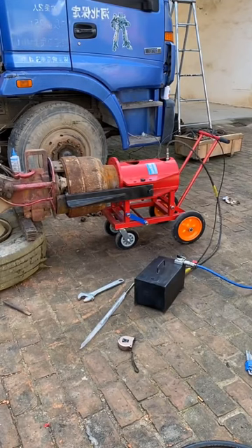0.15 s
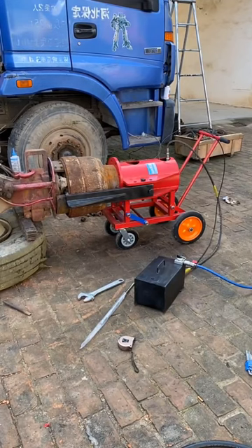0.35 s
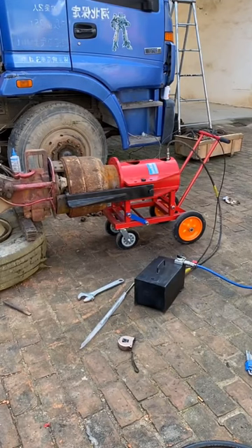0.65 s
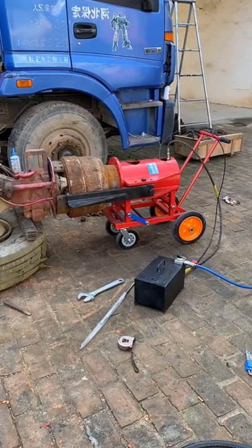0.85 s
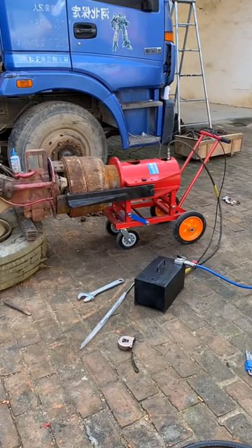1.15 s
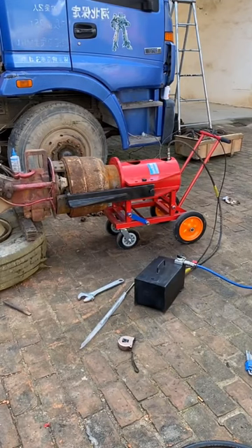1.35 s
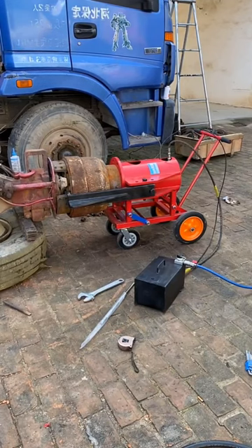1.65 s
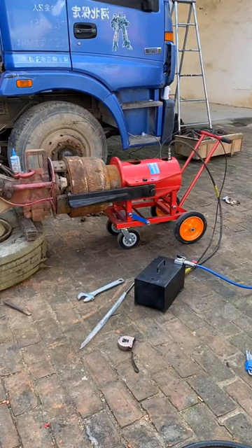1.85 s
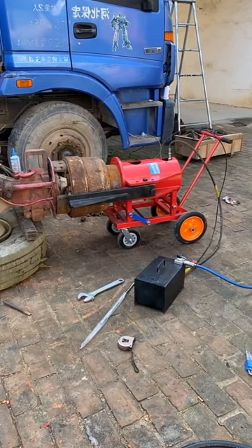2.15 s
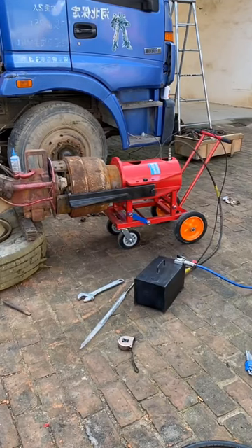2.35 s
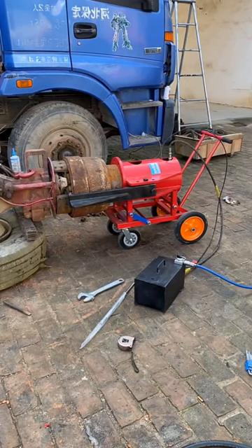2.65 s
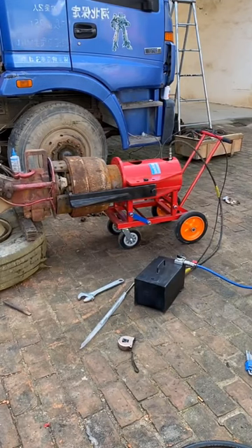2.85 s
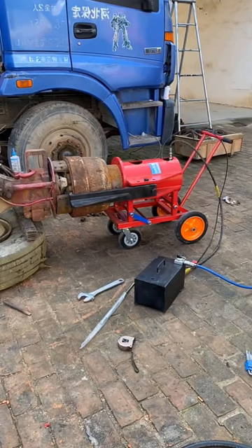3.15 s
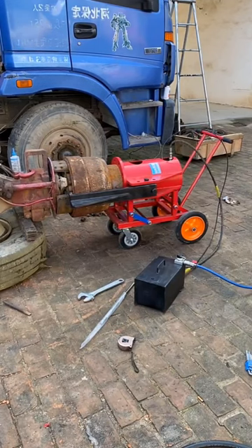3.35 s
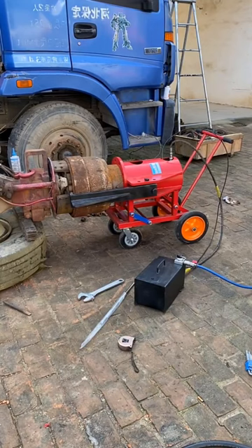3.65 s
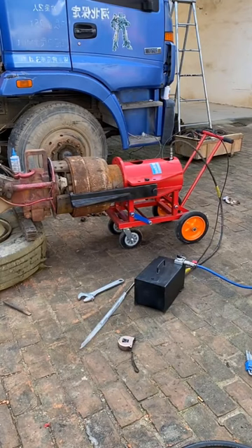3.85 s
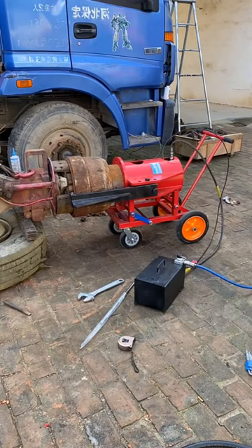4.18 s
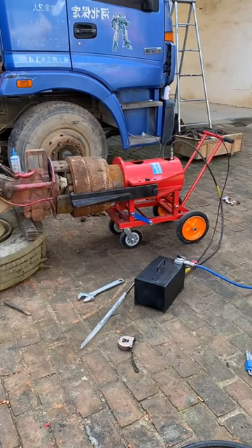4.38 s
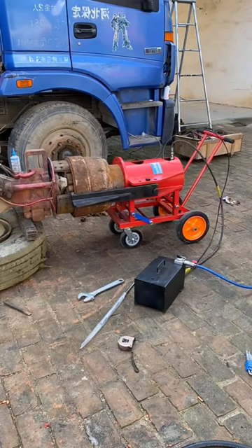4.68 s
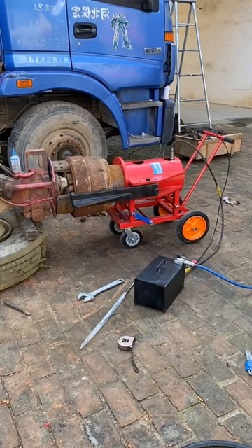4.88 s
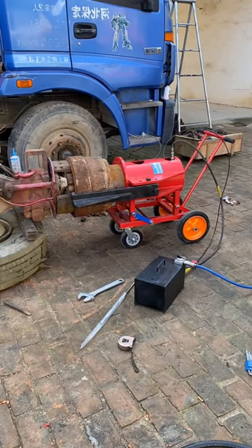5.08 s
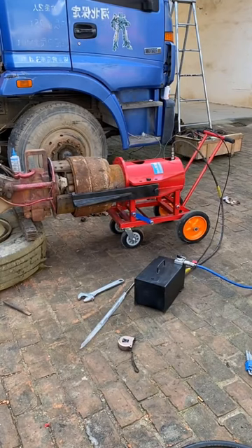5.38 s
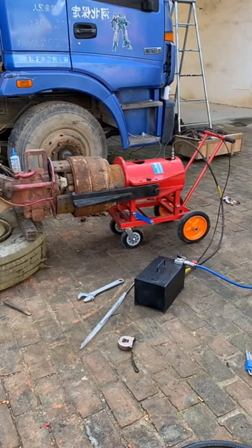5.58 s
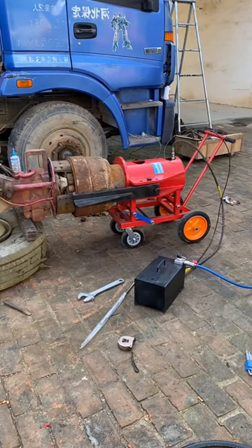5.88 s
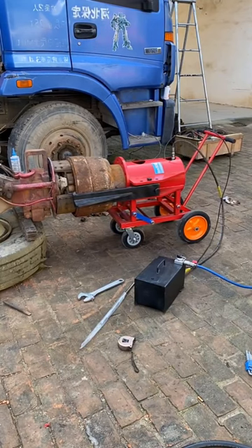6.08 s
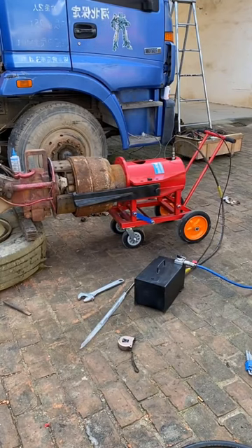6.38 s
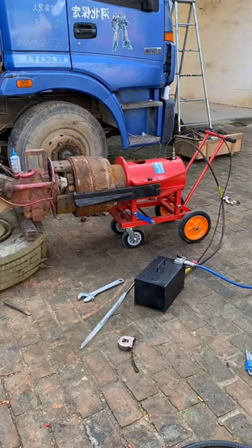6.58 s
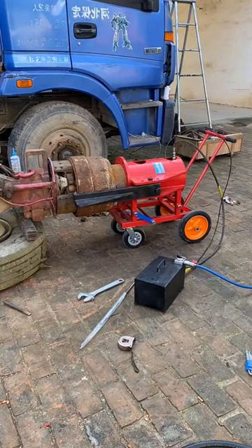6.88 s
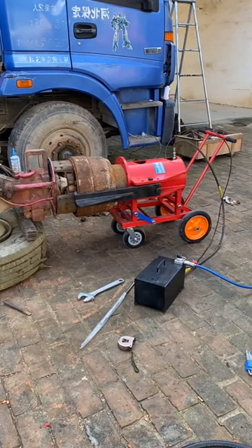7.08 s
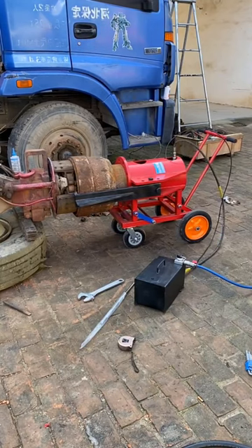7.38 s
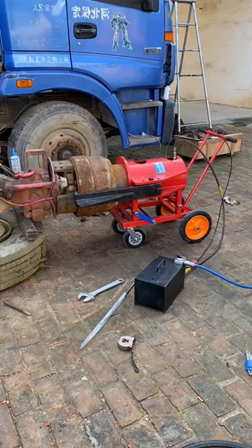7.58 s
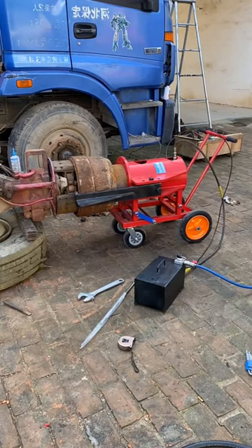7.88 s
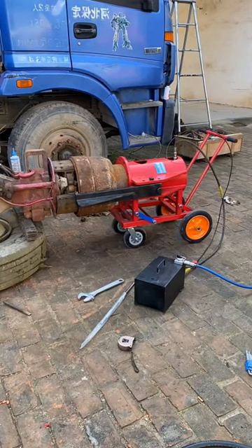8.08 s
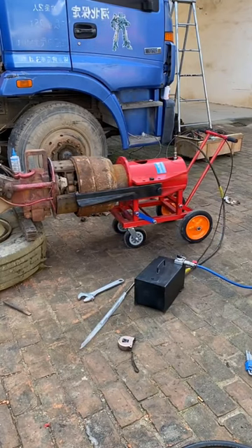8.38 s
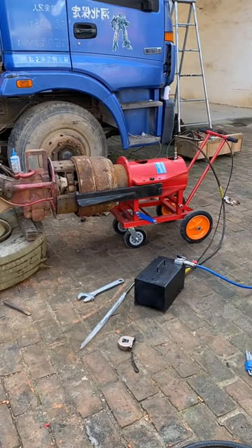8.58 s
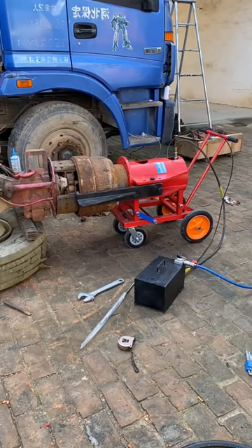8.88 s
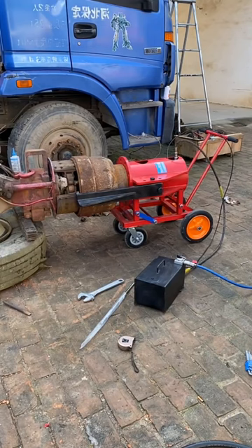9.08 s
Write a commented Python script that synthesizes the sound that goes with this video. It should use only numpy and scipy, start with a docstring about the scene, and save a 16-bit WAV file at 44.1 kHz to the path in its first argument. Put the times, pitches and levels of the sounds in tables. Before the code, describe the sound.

A pneumatic hammer on a trolley drives into a rusty truck axle housing at about thirteen blows a second, never pausing. Each blow is a hard mid-pitched knock with a quick second touch, a short dull ring and a chatter of loose parts. Air puffs hiss between blows over a steady leak, soft piston thumps and low rumble. Heard in stereo from a few metres in a paved yard, with short echoes.

```python
"""A hard metallic hammering at about thirteen blows a second: an air hammer on a trolley drives into
a rusty axle housing in a paved yard. Each blow knocks, touches again and sets housing modes ringing;
loose parts rattle as noise-timed clicks into more modes, and the valve vents a burst of coloured noise.
Soft piston thumps, a steady leak and a low rumble lie underneath; ground, truck and wall throw short echoes."""
import sys
import numpy as np
from scipy import signal
from scipy.fft import rfft, irfft, next_fast_len
from scipy.io import wavfile

SR = 44100
rng = np.random.default_rng(int(sys.argv[2]) if len(sys.argv) > 2 else 0)


def output_pcm(signal):
    """Save a mono or channel-first signal as 16-bit PCM at the path in sys.argv[1].

    Samples are clipped to [-1, 1] before scaling.
    """
    pcm = np.clip(np.atleast_2d(signal).T, -1, 1) * 32767
    wavfile.write(sys.argv[1], SR, np.round(pcm).astype(np.int16))


N = 407043  # length [samples]

# Blows: (first contact [s], its level [dB], second touch after it, before if negative [s],
# second touch level [dB], lower bell level [dB], upper bell level [dB])
BLOWS = [(0.022, -12.5, 0.009, -27, -31, -32.5), (0.096, -11.5, 0.0318, -22, -31, -32.5),
         (0.1678, -11, 0.0086, -11, -25, -32), (0.2409, -12.5, -0.015, -17, -26.5, -27),
         (0.3194, -10, -0.011, -12, -27, -28), (0.3995, -14, 0.006, -18, -29, -27),
         (0.466, -9, -0.0055, -17, -29, -27), (0.541, -7, 0.0031, -22, -25.5, -23.0),
         (0.617, -10.0, 0.0223, -16, -26, -31.0), (0.6905, -10.5, -0.017, -16.0, -33, -36),
         (0.765, -15, -0.0062, -15, -34, -37.5), (0.844, -10.5, 0.013, -9, -27, -25),
         (0.917, -11, -0.007, -13, -28, -27), (0.9884, -7, 0.0037, -12, -25, -27),
         (1.0646, -10, -0.013, -12, -31, -29), (1.139, -9.5, 0.014, -20, -33, -34),
         (1.2075, -13, 0.02, -11, -26.5, -23), (1.2879, -11.5, 0.0109, -16, -25, -31.0),
         (1.359, -10, 0.0075, -8, -25.5, -25), (1.435, -9, 0.0079, -12, -27, -20.0),
         (1.5088, -15, 0.0075, -12, -28, -20.5), (1.583, -8, 0.0035, -12, -25, -26),
         (1.6592, -11.5, 0.0046, -18, -34.0, -43.5), (1.7356, -15.5, 0.0092, -12, -33, -44),
         (1.8084, -11.5, 0.019, -13, -26.5, -23), (1.8834, -11, -0.012, -14, -26.5, -22.5),
         (1.9563, -8, 0.0089, -8, -23.5, -25.0), (2.0317, -10.0, 0.0075, -13, -25, -40),
         (2.1028, -14.0, 0.0078, -10, -30, -26.0), (2.1803, -10, 0.014, -22, -27, -31),
         (2.2541, -8, 0.015, -13.5, -27, -23), (2.3286, -10, 0.0095, -12, -23.5, -22),
         (2.4011, -10.5, 0.0085, -11, -24, -24), (2.478, -6, 0.01, -11, -29, -29),
         (2.5509, -11, 0.015, -15, -33.0, -35), (2.627, -11.5, 0.025, -13, -28.5, -30),
         (2.7013, -9, 0.0123, -15, -27, -29.0), (2.7815, -10.5, 0.011, -20, -25.5, -27),
         (2.8507, -13.0, -0.014, -17, -29, -40), (2.923, -10.0, 0.0075, -18.0, -31, -33),
         (2.9978, -8, 0.0061, -12, -24.5, -26), (3.074, -10.5, -0.0059, -16, -27, -37),
         (3.1476, -6.5, 0.011, -12, -25, -28), (3.222, -10.5, 0.0128, -14, -29, -24.5),
         (3.2943, -13, 0.025, -14, -32.0, -35), (3.3713, -6, 0.023, -16, -26, -30),
         (3.4421, -10.0, 0.02, -11, -25.5, -29), (3.516, -12, 0.0059, -7.5, -31, -33),
         (3.5977, -14, -0.012, -16, -38, -35), (3.665, -12, 0.015, -13, -28.5, -22),
         (3.7431, -12.5, 0.0075, -10.5, -26.0, -27.0), (3.813, -14, 0.011, -15.5, -33.5, -24.0),
         (3.8912, -9, 0.0054, -11.0, -25.5, -28), (3.963, -11, 0.034, -21.5, -30, -33.0),
         (4.036, -12.5, 0.0076, -13, -28.5, -29), (4.1095, -12.5, 0.0085, -18, -27.5, -36),
         (4.186, -7.5, 0.014, -14, -25, -34), (4.26, -9.5, 0.0112, -17, -29.0, -28),
         (4.33, -11.0, 0.041, -15, -31.0, -33), (4.4095, -11.5, 0.011, -8, -30, -34),
         (4.4856, -9.5, 0.0059, -16, -24, -30), (4.5605, -8, 0.0075, -17, -26.5, -34.5),
         (4.632, -10.5, 0.013, -18, -32, -39), (4.711, -8, 0.028, -19, -29, -29.5),
         (4.786, -14.5, 0.0111, -19, -26, -32), (4.8584, -9.5, -0.008, -15, -31, -38),
         (4.9325, -11, 0.012, -12.5, -25.5, -29.5), (5.008, -9.5, 0.017, -12, -27, -24.5),
         (5.0823, -7.5, 0.02, -22, -28, -21.5), (5.1564, -11.5, 0.0075, -14.5, -23.5, -24),
         (5.2317, -8, 0.0075, -11.0, -23, -27), (5.3015, -13, 0.0075, -11, -30, -42),
         (5.3831, -9, -0.0063, -14, -37.0, -37.5), (5.4552, -10, 0.0129, -15.5, -26, -26),
         (5.5287, -7, 0.016, -16, -23.5, -31), (5.603, -7.5, 0.0088, -11, -24, -24),
         (5.6761, -13, 0.0085, -15, -25.5, -30), (5.7526, -14, -0.009, -17, -34.0, -35.5),
         (5.826, -11, 0.0152, -19, -29, -24), (5.9019, -7.5, 0.0077, -13, -25, -27),
         (5.9756, -8, 0.013, -10.0, -23.5, -28.5), (6.0508, -7, 0.034, -16.0, -30, -38),
         (6.1239, -9, 0.024, -33, -29, -40), (6.1965, -9.5, 0.014, -22, -28.5, -32.0),
         (6.274, -10.5, 0.0084, -16, -23, -28), (6.3482, -10, 0.0075, -11.5, -24, -34.0),
         (6.421, -7.5, 0.016, -15.0, -25, -36), (6.499, -7.5, -0.0021, -16, -26, -35.5),
         (6.569, -13, 0.026, -12, -25, -26), (6.6467, -8, 0.0082, -14, -24.5, -31.0),
         (6.7221, -7.5, 0.012, -20, -24, -25), (6.7968, -5.5, 0.018, -23, -25, -36),
         (6.8723, -8, 0.0065, -17, -28, -32), (6.9445, -13.0, -0.0095, -15.0, -26.0, -29.5),
         (7.0203, -20.5, 0.0088, -16.0, -27, -22.5), (7.0936, -8, 0.031, -14.5, -24, -31.0),
         (7.1681, -11, 0.012, -12, -29, -24), (7.2461, -5.5, 0.015, -28, -25.5, -31),
         (7.3185, -6, 0.0093, -13, -26.5, -31.5), (7.392, -11.5, 0.012, -19, -28, -26.5),
         (7.4687, -6.5, 0.0091, -18, -28, -27), (7.5413, -8.5, 0.014, -20, -26.5, -27),
         (7.6163, -9, 0.015, -15.5, -29, -30.0), (7.6894, -8, 0.0097, -10, -24, -30),
         (7.766, -8, 0.0045, -11, -27.0, -30.5), (7.8395, -9.5, 0.032, -17, -28.5, -32.5),
         (7.9163, -10, -0.009, -15, -27.5, -29), (7.9906, -13, 0.012, -14, -31, -27.5),
         (8.065, -8, 0.012, -16, -26, -30), (8.14, -8.5, 0.016, -12, -27, -27.0),
         (8.2135, -8, 0.031, -13, -28, -25.0), (8.2882, -11, 0.018, -16, -29, -32),
         (8.3618, -10.5, 0.0073, -12, -27, -24), (8.4405, -9, 0.013, -11, -26, -29),
         (8.5136, -6.5, 0.012, -13, -29, -23), (8.5892, -4, 0.0048, -19, -28, -30),
         (8.6656, -11.5, -0.007, -14, -32.0, -24), (8.735, -9, 0.021, -15, -25.5, -24),
         (8.8106, -11.5, 0.011, -12, -27.0, -31), (8.8859, -13.5, 0.014, -14, -32.0, -27.5),
         (8.9605, -10.5, 0.0099, -12, -33, -24), (9.035, -12, 0.0271, -19, -33, -30.5),
         (9.1098, -8.5, 0.021, -11, -25, -27.5), (9.194, -5, 0.01, -11, -25.0, -27)]
# Housing modes struck at once: (pitch [Hz], level from the contact [dB], from other touches [dB], t60 [s])
KNOCK_MODES = [(933, -19, -2, 0.056), (1043, -13.5, -16, 0.06), (1065.2, -3.5, -7, 0.072),
               (1083, -5, -13, 0.067), (1205, -12.5, -3.5, 0.092), (1271, -2, -17, 0.088),
               (1299, -16, 0.5, 0.042), (1126, -28, -24, 0.051), (1400, -17.5, -22, 0.093),
               (1516, -10, -15.5, 0.093), (1686, 1, 2, 0.012)]
# Housing modes that take up the blow slowly: (pitch [Hz], t60 [s], build-up [s], delay [s], level [dB])
BELL_MODES = [(690.2, 0.16, 0.0093, -0.004, 11.5), (856.7, 0.13, 0.005, 0.009, 11)]
# Gain of the lower knock modes as the tool shifts its seat: (time [s], level [dB])
SEATING = [(0, -0.5), (1.2, 0.5), (2.6, 0.5), (3.4, 4), (4.3, 2.5), (5.2, 3), (6.5, 0.5), (7.6, 1),
           (8.3, -3), (9.23, 0)]
PIVOT_HZ, UPPER_LOSS = 1110, 0.35  # knock modes above lose this share of the seating gain
CHATTER_DB, CHATTER_SPREAD_DB = -26, 4  # three lesser touches: mean level and spread per blow
CHATTER_S = (0.00092, 0.022)  # range of their delay after the contact
# Blows weaker than SQUARE_DB glance: upper knock modes start scattered over this time, bells later still
SQUARE_DB, GLANCE_S_PER_DB, BELL_LATE = -7, 0.0005, 1.496
CONTACT_HZ = (898, 1540)  # a short contact on a heavy body radiates little outside this band


def hammer():
    """A contact, a second touch and three lesser touches ring the same modes; the bells swell a little later."""
    blow_s, first_db, second_s, second_db, *bell_levels = np.transpose(BLOWS)
    count = len(blow_s)
    chatter_s = blow_s[:, None] + rng.uniform(*CHATTER_S, size=(count, 3))
    chatter_db = CHATTER_DB + CHATTER_SPREAD_DB * rng.standard_normal(count)
    seat_db = over_time(SEATING, blow_s)
    late_s = GLANCE_S_PER_DB * np.maximum(SQUARE_DB - first_db, 0)

    knock = np.zeros(N)
    for hz, struck_db, again_db, t60 in KNOCK_MODES:
        lean_db = seat_db if hz < PIVOT_HZ else -UPPER_LOSS * seat_db
        # the lesser touches vary more than the first two
        spread_db = rng.normal(0, 1, (count, 5)) * [1, 1, 3, 3, 3] + lean_db[:, None]
        start_s = blow_s + (hz > PIVOT_HZ) * late_s * rng.random(count)
        lesser_db = chatter_db[:, None] + again_db + spread_db[:, 2:]
        hits = clicks(start_s, first_db + struck_db + spread_db[:, 0])
        hits += clicks(blow_s + second_s, second_db + again_db + spread_db[:, 1])
        hits += clicks(chatter_s.ravel(), lesser_db.ravel())
        knock += ring(hits, hz, t60)
    out = band(knock, 3, CONTACT_HZ)

    for level_db, (hz, t60, build_s, delay_s, mode_db) in zip(bell_levels, BELL_MODES):
        # a short ring feeding a long one of the same pitch swells before it dies
        hits = clicks(blow_s + delay_s + BELL_LATE * late_s, level_db + mode_db)
        feed = ring(hits, hz, build_s * np.log(1000))  # time constant to t60
        out += ring(feed, hz, t60) * 2 / (build_s * SR)
    return out


# Modes shaken by loose parts after the blow: (pitch [Hz], level [dB], t60 [s])
RATTLE_MODES = [(348, -12, 0.065), (392, -5.5, 0.048), (429.4, -4, 0.1), (500, -1, 0.12),
                (742, -6.5, 0.096), (837, -6, 0.11), (885, 3.5, 0.11), (1209, 2.5, 0.11), (1405, 5, 0.087),
                (1525, -3, 0.089), (1762, -0.5, 0.068), (1855, -1.5, 0.075), (1950, -3.5, 0.086),
                (2030, 3.5, 0.083), (2112, 1.5, 0.087), (2285, 0, 0.1), (2540, -13, 0.062),
                (2650, -4, 0.047), (2742, -1, 0.1), (2865, 0, 0.075)]
# Rattling modes as the tool shifts: (time [s], then the level in each drift band, low to high [dB])
RATTLE_DRIFT = [(0, -1, -1, -2, 4), (1.5, -1.5, 1.5, -3, 3), (3.5, -1, 0, 0, 0), (5.5, 0, -1, 1, -2),
                (7.5, 0.5, 1, 1.5, 0.5), (9.23, 3, 2.5, -1, 5)]
# Drift bands: (low edge [Hz], high edge [Hz])
DRIFT_BANDS = [(0, 600), (1700, 2200), (2200, 2400), (2400, 3000)]
# touch rate just after a blow, level of the weakest touch before mode levels, fade time constant
RATTLE_PER_S, RATTLE_DB, RATTLE_FADE_S = 2600, -35.5, 0.028
SHAKE_SPREAD_DB = 1.4  # each blow shakes each mode by a strength of its own
# the contact also strikes these modes, this far under its own level, one after another within the scatter
JOLT_DB, JOLT_SCATTER_S = -24.5, 0.005


def rattle():
    """Rust flakes and loose parts chatter, thickest just after each blow; each touch rings one mode."""
    moments = cycle()
    shaken = lag(clicks(moments + 0.003, np.zeros(len(moments))), RATTLE_FADE_S) * RATTLE_FADE_S * SR
    touched = rng.random(N) < RATTLE_PER_S * (shaken + 0.05) / SR
    size_db = RATTLE_DB + 3.3 * np.minimum(rng.exponential(1, N), 3.5)
    touches = from_db(size_db) * rng.choice([-1, 1], N) * touched
    chosen_mode = rng.integers(0, len(RATTLE_MODES), N)

    blow_s, first_db, *_ = np.transpose(BLOWS)
    grid = (len(blow_s), len(RATTLE_MODES))
    jolt_db = first_db[:, None] + JOLT_DB + rng.normal(0, 3, grid)
    jolt_s = blow_s[:, None] + JOLT_SCATTER_S * rng.random(grid)

    shake = from_db(rng.normal(0, SHAKE_SPREAD_DB, grid))
    drift_s, *drift_db = np.transpose(RATTLE_DRIFT)
    for band_db, (low, high) in zip(drift_db, DRIFT_BANDS):
        inside = [low < hz < high for hz, *_ in RATTLE_MODES]
        shake = shake * from_db(np.outer(np.interp(blow_s, drift_s, band_db), inside))

    latest_blow = np.clip(np.searchsorted(blow_s, np.arange(N) / SR) - 1, 0, None)
    out = np.zeros(N)
    for k, (hz, db, t60) in enumerate(RATTLE_MODES):
        hits = touches * (chosen_mode == k) * shake[latest_blow, k]
        hits += clicks(jolt_s[:, k], jolt_db[:, k])
        out += from_db(db) * ring(hits, hz, t60)
    return out


# Ground, truck and wall: (left delay [s], right delay [s], level [dB])
ECHOES = [(.0012, .0019, -8.5), (.0036, 0.004496, -15), (.0078, .0088, -21), (.0152, .0163, -9),
          (.0205, .0187, -33), (.029, .026, -16.5), (.037, .04, -25)]


def yard(x):
    """Dull echoes of alternating sign, arriving at other moments at each port."""
    dull = lag(x, 0.00003)
    out = np.zeros((2, N))
    for k, (*delays, db) in enumerate(ECHOES):
        for side, seconds in enumerate(delays):
            d = int(seconds * SR)
            out[side, d:] += (-1) ** (k + side) * from_db(db) * dull[:-d]
    return out


GROUND_S, GROUND_DB = 0.002672, 0  # the paving returns the knock at once


def metal():
    """Hammer and rattle with the paving's return in common; the yard echoes are each port's own part."""
    steel = hammer() + rattle()
    bounce = int(GROUND_S * SR)
    heard = steel + from_db(GROUND_DB) * np.r_[np.zeros(bounce), steel[:-bounce]]
    return from_db(-5.0) * ports(heard, *yard(steel))


# valve timing: opening after the blow, rise time constant, hold from the opening, fall time constant
VENT_OPEN_S, VENT_RISE_S, VENT_SHUT_S, VENT_FALL_S = 0.0045, 0.0075, 0.04, 0.027


def flow():
    """The valve opens fast after each blow, holds, and the pressure then drains slowly."""
    starts = cycle() + VENT_OPEN_S
    t = np.arange(N) / SR
    strength = from_db(rng.normal(0, 0.5, len(starts)))
    out = np.zeros(N)
    for start, gain in zip(starts, strength):
        span = slice(max(int(start * SR) + 1, 0), int((start + 0.2) * SR))
        since = t[span] - start
        opening = 1 - np.exp(-since / VENT_RISE_S)
        draining = np.exp(-np.maximum(since - VENT_SHUT_S, 0) / VENT_FALL_S)
        out[span] += gain * opening * draining
    return out


# Colour of the vented air: (frequency [Hz], relative level per Hz [dB])
VENT_COLOUR = [(200, -5.5), (450, -2.5), (1000, 2), (1500, 1), (2500, 1.5), (3650, -5), (3850, -8),
               (4400, -0.5), (5050, -1.5), (5750, 3.5), (5920, -1), (6300, 1.5), (7000, 1.5), (9400, 0),
               (9700, -0.5), (11500, -3), (13500, 1), (14700, 2.5), (15000, -5.5), (15700, 0)]
# Air supply, as loudness of the vent before VENT_DB: (time [s], level [dB])
PRESSURE = [(0, -24.5), (1.5, -25.5), (3.3, -26), (5.5, -26.5), (7.5, -26.5), (8.3, -25), (9.23, -25.5)]
VENT_DB = 6  # vent over the supply level
JET_GROUND_S, JET_GROUND_DB = 0.002283, -16  # the paving also returns the jet, which ripples its spectrum
WHISTLE_HZ, WHISTLE_WIDTH_HZ, WHISTLE_DB = 5720, 49, -25  # edge tone of the vent port
# band edges, waver depth (standard deviation), time constant of each smoothing pass
JET_SPLITS_HZ, JET_WAVER_DB, JET_WAVER_S = (2520, 4570, 6700, 9800, 13000), 1.72, 0.012


def vent(puffs):
    """Jet noise with an edge tone; it follows the flow and the supply pressure, flutters and changes colour."""
    jet = air(VENT_COLOUR)
    bounce = int(JET_GROUND_S * SR)
    jet = jet + from_db(JET_GROUND_DB) * np.roll(jet, bounce, axis=1)
    whistle = signal.lfilter(*signal.iirpeak(WHISTLE_HZ, WHISTLE_HZ / WHISTLE_WIDTH_HZ, SR), jet)
    jet = jet + from_db(WHISTLE_DB) * whistle / whistle.std()

    # differences of successive low-passes split the jet; each band wavers on its own
    lows = [0]
    for hz in JET_SPLITS_HZ:
        lows.append(signal.sosfiltfilt(signal.butter(3, hz, fs=SR, output="sos"), jet))
    lows.append(jet)
    waver = lag(lag(rng.standard_normal((len(lows) - 1, N)), JET_WAVER_S), JET_WAVER_S)
    wavering = np.zeros((2, N))
    for w, low, high in zip(waver, lows, lows[1:]):
        wavering += from_db(JET_WAVER_DB * w / w.std()) * (high - low)

    flutter = lag(rng.standard_normal(N), 0.001)
    flutter_db = 0.38 * flutter / flutter.std()
    supply_db = over_time(PRESSURE, np.arange(N) / SR)
    return from_db(supply_db + VENT_DB + flutter_db) * puffs * wavering


# Piston thumps through the trolley: (time after the cycle moment [s], pitch [Hz], t60 [s], level [dB])
THUMPS = [(0.0028, 82, 0.042, -40), (0.0111, 93, 0.034, -36), (0.00965, 140, 0.037, -40),
          (0.0029, 268, 0.032, -27), (0.0391, 61, 0.036, -37), (0.0553, 88, 0.051, -38),
          (0.049, 163, 0.054, -37.5), (0.065, 271, 0.041, -35)]
# How hard the stroke shakes the trolley: (time [s], level [dB])
PUSH = [(0, 0), (1.5, 1.5), (3, -0.5), (4.5, -1.5), (5.5, 1.5), (7, 1.5), (8.5, 4), (9.23, -1)]


def thumps():
    """Both ends of the piston stroke push the trolley; the push is soft and alike in both ports."""
    moments = cycle()
    push_db = over_time(PUSH, moments)
    push = np.zeros(N)
    for after_s, hz, t60, db in THUMPS:
        hit_db = db + push_db + rng.normal(0, 0.67, len(moments))
        push += ring(clicks(moments + after_s, hit_db), hz, t60)
    soft = band(push, 4, [46, 330])
    return ports(soft, soft, soft)


# Colour of the leak and yard noise: (frequency [Hz], relative level per Hz [dB])
LEAK_COLOUR = [(25, -22), (45, -20), (80, -6), (185, -8), (260, 2), (450, -2.5), (1100, 7.5), (2200, -4),
               (3800, -6), (5700, -3.5), (9200, -9), (11000, -8.5), (15700, -8)]


def leak():
    """Steady coloured noise of leaking air and the yard."""
    return from_db(-26.5) * air(LEAK_COLOUR)


# Low gusts on the microphone: (time [s], level [dB])
RUMBLE = [(0, -47), (2.0, -51), (6.0, -46), (8.2, -44), (8.9, -42), (9.23, -35.5)]


def rumble():
    """Low lumpy noise, mostly alike in both ports."""
    noise = rng.standard_normal(N) + 0.37 * rng.standard_normal((2, N))
    low = band(noise, 2, [55, 200])
    return from_db(over_time(RUMBLE, np.arange(N) / SR)) * low / low.std()


def cycle():
    """Moments [s] of the piston's even cycle: smoothed blow times, with one more before the start."""
    s = signal.savgol_filter(np.transpose(BLOWS)[0], window_length=15, polyorder=2)
    return np.r_[2 * s[0] - s[1], s]


# Port level difference: (frequency [Hz], left minus right [dB])
TILT = [(60, 0), (110, -.5), (200, -2.5), (380, -6.0), (700, -6.5), (1100, -1.5), (2400, -1.2), (4400, -.6),
        (6000, 0)]
# Port phase difference: (frequency [Hz], left leads right by [rad])
LEAD = [(1, 0), (950, .4), (1720, .15), (2760, .7), (3960, 0), (4740, 1.9), (5600, 1.3), (8350, 3.1),
        (9560, 3.1), (10100, .2), (11000, 1.5), (11900, 1.3), (14600, 3.1), (15400, 3.1)]
# Port likeness: (frequency [Hz], share of power common to both ports [0-1])
LIKENESS = [(60, .92), (140, .8), (300, .82), (500, .6), (800, .3), (1200, .33), (2000, .48), (3300, .25),
            (3900, .55), (4900, .2), (5600, .48), (7900, .45), (8700, .95), (9450, .95), (9750, .3),
            (11200, .25), (13500, .45), (15000, .6)]


def ports(common, left, right, spectrum=((1, 0), (2, 0))):
    """Two microphone ports: a shared sound, tilted and phase shifted, plus each port's own part."""
    size = next_fast_len(N + 4096)
    hz = np.arange(size // 2 + 1) * SR / size
    alike = np.clip(at_hz(LIKENESS, hz), 0, 1)
    shared, own = np.sqrt(alike) * rfft(common, size), np.sqrt(1 - alike)
    # each port takes half of the phase and level difference
    turn = np.exp(0.5j * at_hz(LEAD, hz))
    tilt = from_db(at_hz(TILT, hz) / 2)
    left_port = tilt * (shared * turn + own * rfft(left, size))
    right_port = (shared / turn + own * rfft(right, size)) / tilt
    colour = from_db(at_hz(spectrum, hz))
    return irfft(colour * np.array([left_port, right_port]), size)[:, :N]


def air(spectrum):
    """Stereo noise of a given colour, rms 1."""
    noise = ports(*rng.standard_normal((3, N)), spectrum)
    return noise / noise.std()


def from_db(db):
    """Gain of a level in dB."""
    return 10 ** (np.asarray(db) / 20)


def at_hz(points, hz):
    """Reads a (frequency [Hz], value) table on a log axis."""
    points = np.array(points)
    return np.interp(np.log(hz + 1), np.log(points[:, 0] + 1), points[:, 1])


def over_time(points, seconds):
    """Reads a (time [s], level [dB]) table along straight lines."""
    return np.interp(seconds, *np.transpose(points))


def clicks(times, db):
    """A train of single-sample clicks."""
    out = np.full(N, 1e-18)  # a trace above zero keeps the filters fast
    at = np.round(np.asarray(times) * SR).astype(int)
    inside = (at >= 0) & (at < N)
    np.add.at(out, at[inside], from_db(db)[inside])
    return out


def ring(x, hz, t60):
    """A two-pole resonator: a unit click sets a decaying sine of height 1 ringing."""
    r, w = from_db(-60 / (t60 * SR)), 2 * np.pi * hz / SR
    return signal.lfilter([0, np.sin(w)], [1, -2 * r * np.cos(w), r * r], x)


def lag(x, seconds):
    """One-pole smoothing with a time constant."""
    r = np.exp(-1 / (seconds * SR))
    return signal.lfilter([1 - r], [1, -r], x)


def band(x, order, edges_hz):
    """Butterworth band-pass."""
    return signal.sosfilt(signal.butter(order, edges_hz, "band", fs=SR, output="sos"), x)


def scene():
    """Hammer and rattle, vent, thumps, leak and rumble."""
    return metal() + vent(flow()) + thumps() + leak() + rumble()


def record(dry):
    """The microphone drops the deepest bass; the top is cut steeply."""
    thin = signal.sosfilt(signal.butter(2, 22, "high", fs=SR, output="sos"), dry)
    return signal.sosfilt(signal.cheby2(30, 70, 15650, fs=SR, output="sos"), thin)  # stopband from 15650 Hz


dry = scene()
out = record(dry)
output_pcm(out)
```